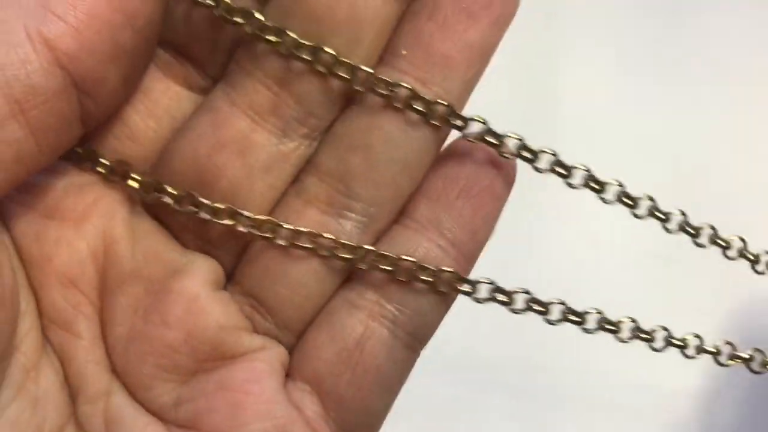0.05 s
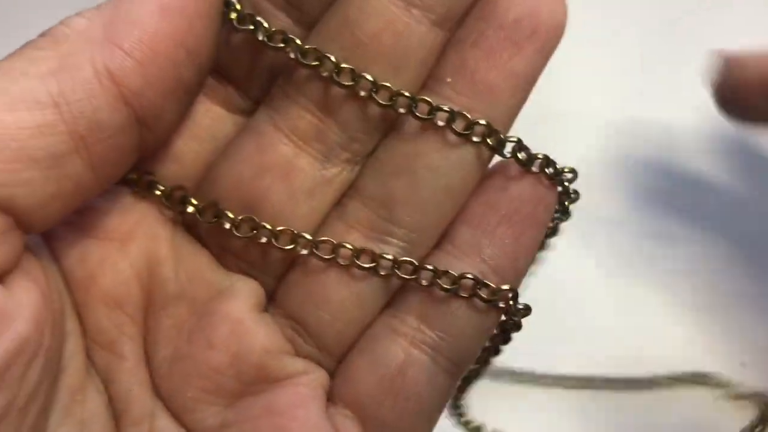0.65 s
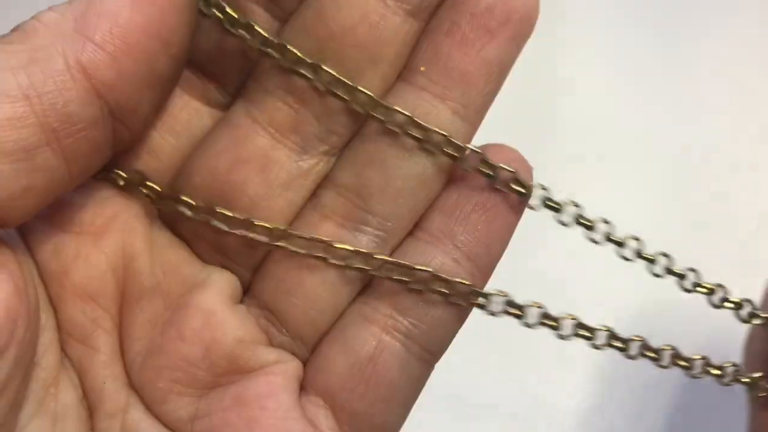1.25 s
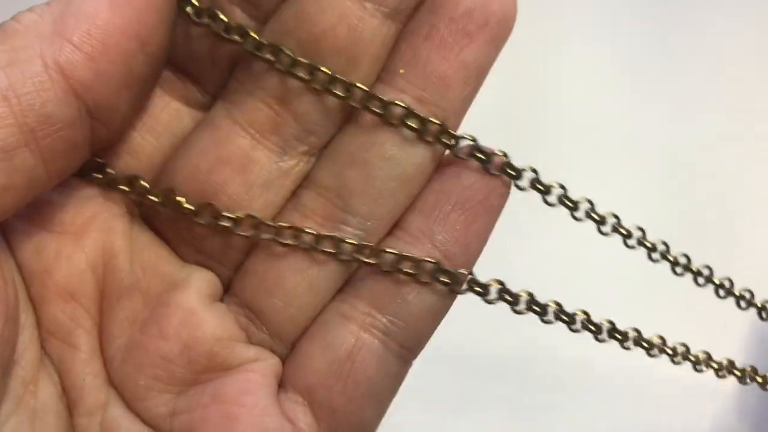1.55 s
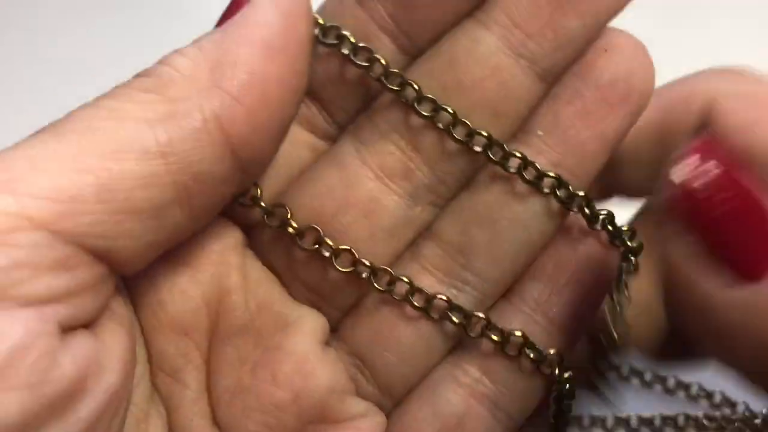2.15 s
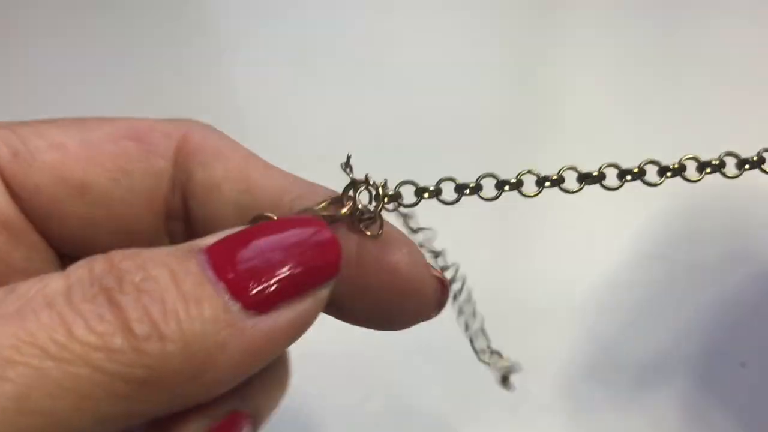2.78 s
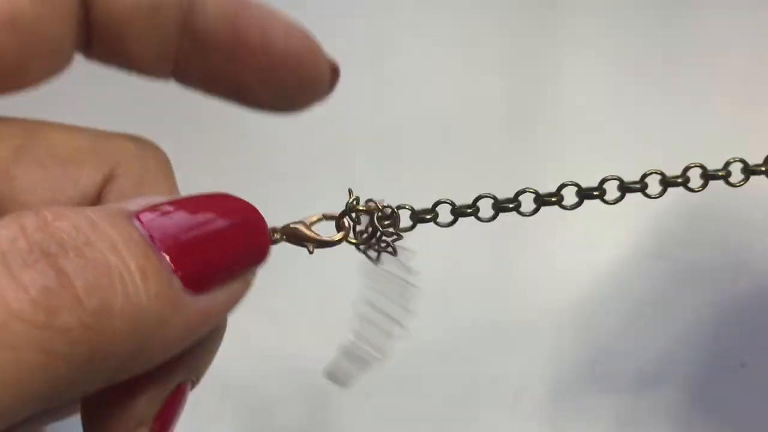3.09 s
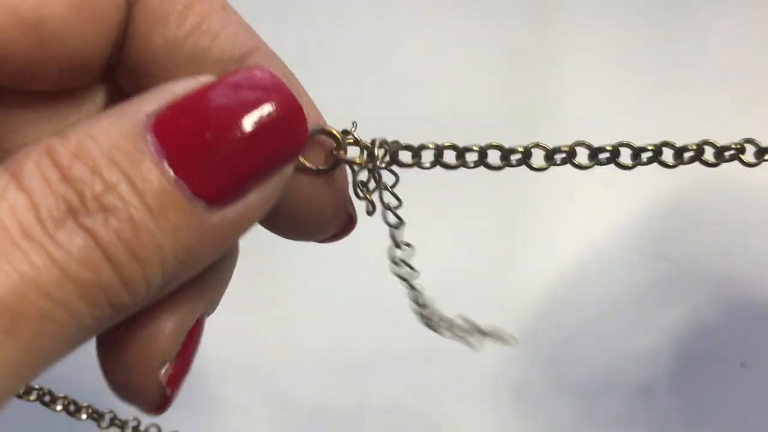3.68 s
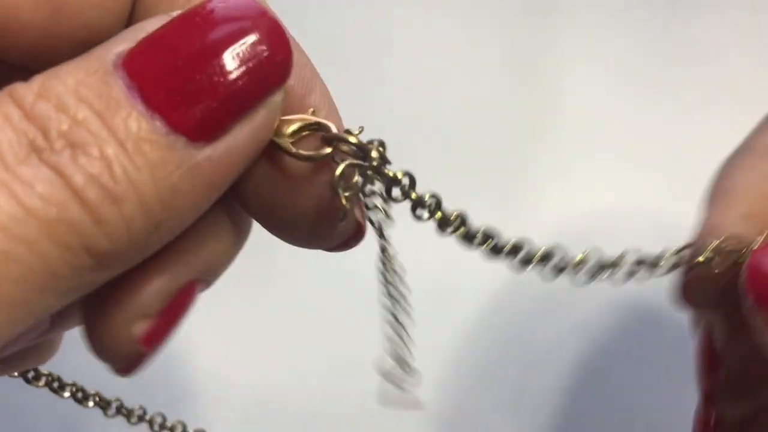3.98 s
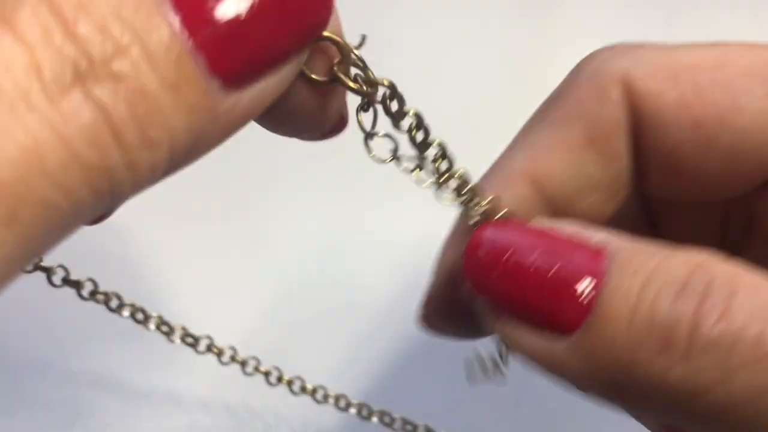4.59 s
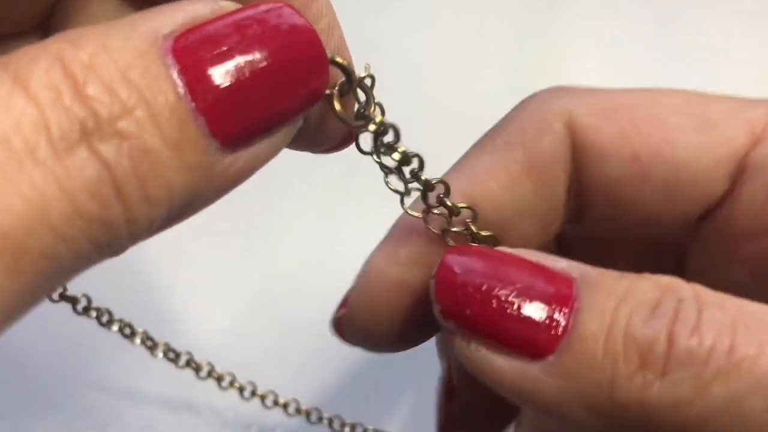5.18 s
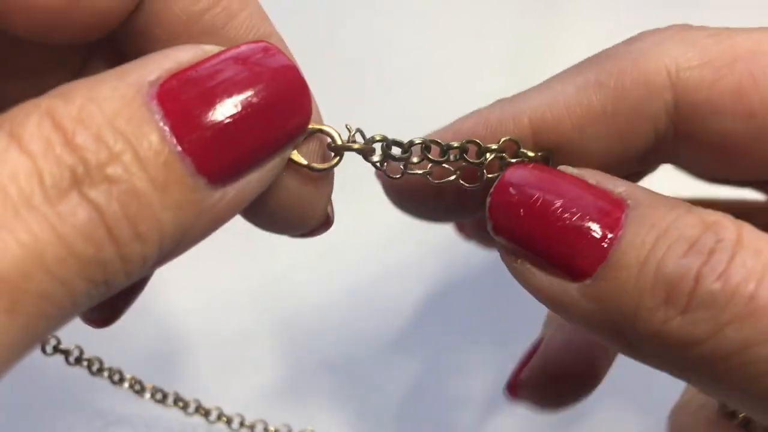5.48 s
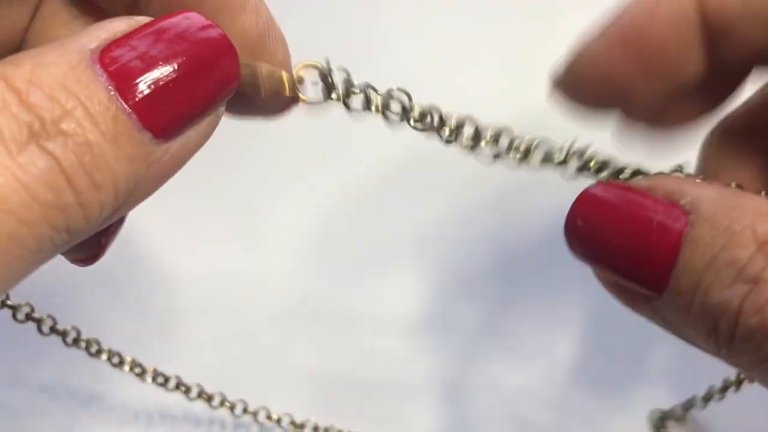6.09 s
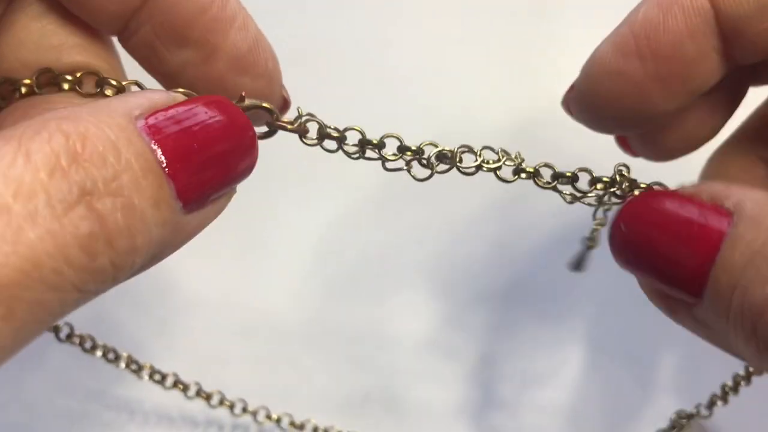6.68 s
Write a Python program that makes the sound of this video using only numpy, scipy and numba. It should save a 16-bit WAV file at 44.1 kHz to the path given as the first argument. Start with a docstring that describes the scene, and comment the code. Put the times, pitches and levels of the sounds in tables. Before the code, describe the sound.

A thin metal chain necklace clinks and rustles in the fingers as it is untangled, the clicks growing fainter and fewer.

```python
"""Small, bright clinks open the scene: a thin metal chain necklace is drawn over the fingers and picked
apart, close to a phone in a small quiet room. Links knock and bounce back with a very short ring.
They rustle in spurts of tiny contacts as the chain slides or drops, and tick at random as the fingers
work at the knot. The duller part of each contact rings at a pitch set by the grip.
The first hard knocks carry a low thud; later the hands make a few soft, low bumps."""
import sys
import numpy as np
from scipy import signal
from scipy.fft import rfft, irfft
from scipy.io import wavfile
from scipy.ndimage import uniform_filter1d
from numba import njit

SR = 44100
rng = np.random.default_rng(int(sys.argv[2]) if len(sys.argv) > 2 else 0)


def to_wav(sig):
    """Store sig (one row per channel, or 1-D mono) as 16-bit WAV at the path in sys.argv[1].

    Samples outside -1..1 are clipped; the rate is SR.
    """
    pcm = np.clip(np.atleast_2d(sig), -1, 1) * 32767
    pcm = np.round(pcm).astype(np.int16)
    wavfile.write(sys.argv[1], SR, pcm.T)  # frames by channels


N = 302085
TIME = np.arange(N) / SR
RING_TIME = np.arange(1024) / SR  # seconds within one short ring

# Tone colours: how strong each pitch is next to the others. Columns: pitch_hz, level_db
AIR_COLOUR = [(20, -16.5), (44, 3.5), (70, -11), (115, -14.5), (155, -8.5), (205, -11.5), (250, -8),
              (295, -20.5), (345, -16), (460, -31.5), (800, -32.5), (2000, -37.5), (5000, -44),
              (16000, -47)]  # the room's background
CONTACT_COLOUR = [(300, -39.5), (1500, -42), (3500, -18), (5400, 2.5), (7500, 8.5), (9500, 8), (11600, 8.5),
                  (15800, 1)]  # the first instant of link touching link
SKIN_COLOUR = [(200, -18.5), (350, -11), (550, -27.5), (800, -18), (1080, -3), (1600, -9), (2100, -3.5),
               (2800, -2), (3500, -3.5), (5500, 0.5), (10000, -6.5), (15000, -26)]  # the chain against skin and nails
# Low thuds: the body of the first hard chain knocks, then soft hand bumps.
# Columns: start_s, level_db, pitch_hz
LOW_THUDS = [(0.013, -44.5, 254.6), (0.031, -45.5, 190.7), (0.949, -24.5, 56.2), (0.991, -20, 51.7),
             (1.0, -39.5, 196.7), (1.019, -34.5, 136), (1.077, -32.5, 56), (3.351, -37, 45.3),
             (4.027, -25.5, 49.5), (4.053, -42, 102.5), (4.11, -41, 50.4), (4.15, -42.5, 75.9),
             (4.336, -44.5, 42.6), (5.523, -40, 100.7), (5.556, -38, 41.95), (6.096, -43.5, 42),
             (6.570, -45.5, 41.2)]
# Fingertips shift their grip. Columns: start_s, length_s, level_db
FINGERTIP_RUBS = [(0.001, 0.071, -43), (4.03, 0.039, -64), (5.51, 0.1, -59)]
# How the grip changes the chain's dull ring. Columns: start_s, length_s, pitch_hz, boost_db
CHAIN_GRIPS = [(0.0, 0.12, 2800, -0.5), (0.49, 0.12, 4240, 7), (1.063, 0.189, 2680, 9.5),
               (1.615, 0.26, 4420, 11), (2.365, 0.074, 2600, 14), (2.72, 0.21, 4360, 8.5),
               (4.401, 0.22, 2700, -7)]
# The brightest ring of the moving links. Columns: time_s, pitch_hz, boost_db
BRIGHT_RINGS = [(0, 11500, -28), (.55, 11900, 0), (1.1, 11230, -23), (1.7, 12600, 0), (2.85, 8900, -10.5),
                (3.85, 11840, 3.5), (4.25, 8200, -16), (5.2, 9200, -3), (6.1, 11400, -5.5)]
# The tones of one link, damped by the fingers. Columns: pitch_hz, fade_s, level_db
# Every fade_s is the time a sound takes to fall by 60 dB.
LINK_TONES = [(5660, 0.0036, -6), (8200, 0.001, -0.5), (10500, 0.0057, -10), (11400, .003, -5),
              (13200, 0.004, 3.5), (14200, 0.0063, -7)]
# The chain slides over the fingers. Columns: start_s, rise_s, length_s, level_db, dull_offset_db
# Here and below, level_db sets the bright part; adding dull_offset_db gives the dull part.
CHAIN_SLIDES = [(0.0, 0.021, .18, -57, 3.5), (0.2, .04, 0.16, -58.5, -3), (0.35, .02, 0.077, -72.5, 8),
                (0.449, 0.079, 0.22, -35.5, -5.5), (0.661, 0.015, .13, -47, -3.5),
                (0.812, 0.047, 0.12, -56, -5), (0.95, 0.087, 0.21, -43.5, 0.5),
                (1.144, 0.025, 0.16, -53, -2), (1.282, .02, 0.26, -66.5, 4.5),
                (1.564, 0.029, 0.15, -55.5, 0), (1.74, 0.025, 0.21, -65, 4),
                (1.953, 0.063, 0.15, -44, -3.5), (2.12, 0.14, 0.23, -44, -3.5), (2.41, .04, .125, -47, 0),
                (2.645, .15, .29, -45, 1), (2.93, 0.11, 0.23, -55.5, 4), (3.299, 0.054, 0.19, -70.5, 3.5),
                (3.72, 0.26, .2, -68, -5), (3.926, .02, .12, -68.5, 2), (4.066, 0.18, 0.24, -60.5, 2.5),
                (4.314, 0.25, 0.35, -60, 4.5), (4.653, 0.026, 0.38, -70.5, 1),
                (5.1, .04, 0.21, -67.5, -1.5), (5.55, 0.02, 0.16, -73, 2), (5.87, 0.086, 0.095, -65, -3),
                (6.049, 0.021, 0.096, -75, -1)]
# A slack stretch drops or is pulled straight. Columns: start_s, level_db, dull_offset_db, fade_s
CHAIN_JINGLES = [(0.036, -31, -2, 0.25), (0.195, -33, -1, 0.22), (0.759, -47, -1, 0.17),
                 (1.622, -37.5, -1.5, 0.22), (1.879, -47.5, -3, 0.75), (1.921, -24, -12, 0.24),
                 (2.356, -33, -3, .22), (2.407, -26, -4, .17), (4.007, -54, 1, 0.14),
                 (4.865, -49.5, -5, 0.2), (5.03, -41.5, -7, 0.15), (5.074, -39, -3, 0.14),
                 (6.056, -51, -6, 0.13)]
# The fingers work at the knot. Columns: start_s, length_s, level_db
PICKING_SPELLS = [(0.198, .12, -45.5), (0.523, .17, -30.5), (0.868, .06, -41), (0.968, .2, -40),
                  (1.191, .3, -55.5), (1.66, .17, -49), (2.254, .22, -40.5), (2.795, .15, -43),
                  (3.07, .1, -61), (3.828, .09, -43.5), (4.439, .22, -61), (4.674, .29, -48),
                  (5.039, .13, -50), (5.598, .38, -59.5)]
# The clearest knocks of link on link. Columns: start_s, level_db, dull_offset_db
LINK_KNOCKS = [(0.0092, -35, 8.5), (0.0138, -17, 1), (0.0324, -14, 2), (0.0376, -21, -15), (0.06, -28.5, 0),
               (0.0861, -34, -1.5), (0.192, -24, -7), (0.1966, -22, -4), (0.3327, -42, -1.5),
               (0.347, -47, 2), (0.4548, -38, -5), (0.523, -30.5, -4), (0.5467, -28, -1.5),
               (0.5874, -27.5, -13), (0.647, -36, -10), (0.723, -34.5, -2.5), (0.7587, -35, -14),
               (0.8766, -37.5, -7.5), (0.8918, -34.5, -13), (0.9097, -38.5, -8.5), (0.9698, -36.5, -11),
               (0.9872, -32, -8.5), (1.02, -32, -5.5), (1.029, -21.5, -9), (1.0522, -28, -16),
               (1.0621, -29, -11), (1.128, -27.5, -3), (1.2125, -39.5, -3.5), (1.2544, -37, -7),
               (1.264, -38, -8), (1.3507, -47.5, 5), (1.431, -46, -1.5), (1.481, -50, 2),
               (1.5839, -58, 7.5), (1.6015, -45, 2), (1.6068, -28, -6.5), (1.6198, -25.5, -3.5),
               (1.6288, -25, -2), (1.68, -43, -2), (1.7033, -39, -1.5), (1.7255, -36, -6.5),
               (1.7784, -44, -0.5), (1.8381, -49, 0.5), (1.872, -48.5, -15.5), (1.877, -32, -4),
               (1.9219, -21, -16), (1.925, -29, -2), (1.934, -27, -1.5), (1.9445, -15.5, -9.5),
               (2.037, -29.5, -7), (2.0663, -26.5, -10), (2.0752, -35.5, -2.5), (2.0837, -30, -7),
               (2.2567, -33, -12), (2.2685, -38, -4), (2.2908, -31, -2), (2.3272, -50, -12),
               (2.3549, -28, 3.5), (2.3591, -28, -3), (2.3754, -25.5, -0.5), (2.405, -21, -4.5),
               (2.4131, -22, -3), (2.422, -21, -9), (2.4442, -27, -13), (2.7371, -33.5, -2.5),
               (2.7887, -28.5, -9.5), (2.8372, -52, -14), (2.9095, -27, -5.5), (2.9339, -29, -5.5),
               (3.0503, -36.5, -7), (3.097, -43, 1), (3.711, -40.5, -6.5), (3.7421, -36, -10),
               (3.7737, -35, -5), (3.8006, -43, -17), (3.8155, -37, -6.5), (3.8633, -35, -8),
               (3.873, -36.5, -8), (3.8862, -46, -9), (3.899, -35, -10), (3.9106, -31.5, -7.5),
               (3.988, -46.5, -10), (4.0062, -36.5, -6), (4.0222, -45, -3), (4.0993, -55.5, -7),
               (4.2633, -38.5, -5.5), (4.329, -50.5, -3), (4.4634, -50.5, -2), (4.5296, -44.5, -7),
               (4.641, -46.5, -3.5), (4.709, -46, -4.5), (4.766, -43.5, -6.5), (4.774, -53, 2),
               (4.8005, -40, -7.5), (4.861, -38, -5), (4.8648, -31, -8), (4.9085, -39, -16),
               (4.9223, -37.5, -4.5), (5.0004, -40, -5.5), (5.0251, -28.5, -9), (5.0337, -31, -10),
               (5.0419, -37, -5), (5.0697, -29.5, -5), (5.0843, -33, -5.5), (5.1792, -44, -5.5),
               (5.2753, -47.5, -6), (5.2852, -50, 1.5), (5.519, -51.5, -3.5), (5.6188, -47, -1.5),
               (5.6475, -41, -4.5), (5.6875, -56, -9), (5.7223, -44.5, -6), (5.7561, -53.5, -1.5),
               (5.9094, -56.5, -7), (5.9437, -51.5, -7.5), (5.9895, -43, -4.5), (6.0513, -49, -13),
               (6.0556, -33, -10.5), (6.103, -48.5, -14), (6.1292, -47.5, -6.5), (6.3301, -55.5, 0.5),
               (6.3584, -62, -10), (6.7504, -59.5, -1)]


def gain(db):
    """Turn decibels into a number to multiply by."""
    return 10 ** (np.asarray(db) / 20)


def unit(x):
    """Scale a sound to an energy of one."""
    return x / np.sqrt(np.sum(x ** 2))


def add(track, start_s, sound):
    """Mix a sound into a track at the given time."""
    i = int(np.clip(start_s * SR, 0, N - 1))
    track[i:i + len(sound)] += sound[:N - i]


def fade(t, fade_s):
    """A level that falls by 60 dB every fade_s seconds."""
    return np.exp(-np.log(1000) * t / fade_s)


def colour_filter(points, size=1024):
    """Make a short click with the tone colour of (pitch_hz, level_db) points, for use as a filter."""
    hz, db = np.transpose(points)
    grid_hz = np.maximum(np.arange(size // 2 + 1) * SR / size, 1)
    grid_db = np.interp(np.log(grid_hz), np.log(hz), db)
    cepstrum = irfft(np.log(gain(grid_db)))
    # folding this onto its first half packs the energy at the start of the click
    cepstrum[1:size // 2] *= 2
    cepstrum[size // 2 + 1:] = 0
    return unit(irfft(np.exp(rfft(cepstrum))))


def through(x, click):
    """Filter a sound: each sample sets off its own copy of the click."""
    return signal.oaconvolve(x, click)[:len(x)]


def room_air(level_db=-54):
    """The room rumbles low, with a thin hiss above."""
    return gain(level_db) * through(rng.standard_normal(N), colour_filter(AIR_COLOUR, size=16384))


def room_echoes(x, table_db=-11, wall_db=-17, low_fade_s=0.36, high_fade_s=0.19):
    """Add quick echoes from hands and table, then a faint tail that loses its treble first."""
    t = np.arange(SR // 2) / SR
    near, low, high = rng.standard_normal((3, len(t)))
    near = unit(near * fade(t, .04) * (t > .0012))
    wall_colour = colour_filter([(200, -6.5), (1100, -6.5), (3000, -11.5), (16000, -37)])
    low = through(low, wall_colour) * fade(t, low_fade_s)
    tail = unit((low + high * fade(t, high_fade_s)) * (t > .007))
    return x + through(x, gain(table_db) * near + gain(wall_db) * tail)


def table_echo(x, delay_s=.00195, echo_db=-8, cutoff_hz=5000):
    """The table top sends back a dull copy a moment later, which ripples the tone colour."""
    echo = signal.lfilter(*signal.butter(1, cutoff_hz, fs=SR), x)
    return x + gain(echo_db) * np.pad(echo, (int(delay_s * SR), 0))[:N]


def low_thuds(rise_s=0.0048, fade_s=0.22, scuff_db=-15):
    """A hard chain knock or a soft hand bump sets off a few low swings and a dull scuff."""
    track, t = np.zeros(N), np.arange(SR // 3) / SR
    colour = colour_filter([(30, -1.5), (170, 0.5), (300, -19), (600, -40), (1500, -30.5),
                            (8000, -80.5)], size=4096)
    swell = (1 - np.exp(-t / rise_s)) ** 2 * fade(t, fade_s)
    swell /= swell.max()
    for start_s, level_db, pitch_hz in LOW_THUDS:
        scuff = gain(scuff_db) * through(rng.standard_normal(len(t)), colour)
        swing = np.sin(2 * np.pi * pitch_hz * t)
        add(track, start_s, gain(level_db) * swell * (scuff - swing))
    return track


def finger_rubs():
    """Fingertips shift their grip with a brief, dull swish."""
    track = np.zeros(N)
    colour = colour_filter([(200, -4), (350, 7), (550, 2), (1300, -2.5), (3000, -10), (12000, -13)])
    for start_s, length_s, level_db in FINGERTIP_RUBS:
        progress = np.linspace(0, 1, int(length_s * SR))
        swish = through(rng.standard_normal(len(progress)), colour)
        add(track, start_s, gain(level_db) * np.sin(np.pi * np.sqrt(progress)) * swish)
    return track


@njit
def resonate(x, pitch_hz, width_hz):
    """Keep only the band of sound around a moving pitch."""
    y, band, low = np.empty(len(x)), 0., 0.
    for i in range(len(x)):
        tuning, damping = np.tan(np.pi * pitch_hz[i] / SR), width_hz / pitch_hz[i]
        swing = (band + tuning * (x[i] + 1e-18 - low)) / (1 + tuning * (tuning + damping))
        band = 2 * swing - band
        low += 2 * tuning * swing
        y[i] = damping * swing
    return y


def grip_ring(dull, free_hz=4360., free_db=3.5, pinch_s=0.018, width_hz=520., upper_hz=5500.):
    """The held chain rings at two pitches; the lower follows the grip and is lowest when pinched."""
    pitch_hz, boost_db = np.full(N, free_hz), np.full(N, free_db)
    for start_s, length_s, grip_hz, grip_db in CHAIN_GRIPS:
        inside_s = np.minimum(TIME - start_s, start_s + length_s - TIME)
        grip = np.clip(1 + inside_s / pinch_s, 0, 1)
        pitch_hz += grip * (grip_hz - free_hz)
        boost_db += grip * (grip_db - free_db)
    lower = resonate(dull, pitch_hz, width_hz)
    upper = gain(-5) * resonate(dull, np.full(N, upper_hz), width_hz)
    boost = gain(boost_db)
    return (dull + boost * (lower + upper)) / (1 + .26 * boost)


def bright_ring(bright, width_hz=2300.):
    """Different stretches of the chain favour different parts of the treble."""
    time_s, pitch_hz, boost_db = np.transpose(BRIGHT_RINGS)
    ring = resonate(bright, np.interp(TIME, time_s, pitch_hz), width_hz)
    boost = gain(np.interp(TIME, time_s, boost_db))
    return (bright + boost * ring) / (1 + 0.25 * boost)


def link_tick(crack, detune=0.012, scatter_db=2, ring_db=-8.5):
    """A hard crack and a short ring; each link has its own size and is struck at its own spot."""
    pitch_hz, fade_s, level_db = np.transpose(LINK_TONES)[:, :, None]
    size, spot = rng.standard_normal((2, len(pitch_hz), 1))
    signs = rng.choice([-1, 1], (len(pitch_hz), 1))
    strength = signs * gain(level_db + scatter_db * spot) / np.sqrt(fade_s)
    tones = np.sin(2 * np.pi * pitch_hz * (1 + detune * size) * RING_TIME)
    ring = np.sum(strength * tones * fade(RING_TIME, fade_s), axis=0)
    return unit(crack + gain(ring_db) * unit(ring))


def chain_motion(onset_db=-18, stop_fade_s=0.095, jingle_rise_s=.004):
    """Bright and dull levels over time: slides speed up, hold and stop; jingles jump up and fade."""
    bright_power, dull_power = np.zeros((2, N))
    t = TIME[:SR]

    def add_move(start_s, shape, level_db, dull_offset_db):
        add(bright_power, start_s, (gain(level_db) * shape) ** 2)
        add(dull_power, start_s, (gain(level_db + dull_offset_db) * shape) ** 2)

    for start_s, rise_s, length_s, level_db, dull_offset_db in CHAIN_SLIDES:
        speed_up = gain(onset_db * np.maximum(1 - t / rise_s, 0))
        stop = fade(np.maximum(t - length_s, 0), stop_fade_s)
        add_move(start_s, speed_up * stop, level_db, dull_offset_db)
    for start_s, level_db, dull_offset_db, fade_s in CHAIN_JINGLES:
        add_move(start_s, np.minimum(t / jingle_rise_s, 1) * fade(t, fade_s), level_db, dull_offset_db)
    return np.sqrt([bright_power, dull_power])


def catch_and_slip(slips_per_s=110, fade_s=0.023, depth=0.43):
    """Links catch and slip one after another, so the rustle's level comes in uneven spurts."""
    slips = (rng.random(N) < slips_per_s / SR) * (.5 + rng.random(N))
    spurts = np.maximum(through(slips, fade(TIME[:SR // 8], fade_s)), 0)
    average = uniform_filter1d(spurts, size=2200)
    return 1 - depth + depth * spurts / (average + .02)


def tiny_hits(per_s, spread_db):
    """Random tiny impacts, many weak and few strong, evened out to a power near one."""
    happens = rng.random(N) < per_s / SR
    sizes = gain(spread_db * np.minimum(rng.exponential(size=N), 4))
    hits = happens * sizes * rng.choice([-1, 1], N)
    power = np.maximum(uniform_filter1d(hits ** 2, size=1300), 0)
    return hits / np.sqrt(power + 1e-3)


def chain_rustle(link_count=16, hits_per_s=4200, reference_db=-45, skin_hits_per_s=4000):
    """Bright ticks crowd into a rustle as the chain slides faster; it also rubs dully over the skin."""
    bright_level, dull_level = chain_motion()
    per_s = hits_per_s * (bright_level / gain(reference_db)) ** .45
    spurts = catch_and_slip()
    hits, crack = tiny_hits(per_s, spread_db=4), colour_filter(CONTACT_COLOUR)
    struck_link = rng.integers(0, link_count, N)
    ticks = sum(through(hits * (struck_link == link), link_tick(crack)) for link in range(link_count))
    skin_hits = tiny_hits(per_s + skin_hits_per_s, spread_db=3.9)
    rubbing = through(skin_hits + gain(-4.5) * hits, colour_filter(SKIN_COLOUR))
    return np.array([bright_level * spurts * ticks, dull_level * np.sqrt(spurts / 2) * rubbing])


def loose_link_rows(ticks_per_s=42, spread_db=4, dull_offset_db=-8):
    """Loose links tick at uneven times while the fingers work; gives rows like those of LINK_KNOCKS."""
    rows = []
    for start_s, length_s, level_db in PICKING_SPELLS:
        chance = rng.random((64, 3))
        times = start_s + np.cumsum(.3 + 1.4 * chance[:, 0]) / ticks_per_s
        scatter_db = spread_db * np.sqrt(12) * (chance[:, 1:] - .5)
        for time_s, (level_change, dull_change) in zip(times, scatter_db):
            if time_s < start_s + length_s:
                rows.append((time_s, level_db + level_change, dull_offset_db + dull_change))
    return rows


def link_chatter(jolt_db, jolt_fade_s=0.006, rise_s=.0007):
    """Two links meet at a few points in about a millisecond; the jolt runs on through their neighbours."""
    meeting, jolt = rng.standard_normal((2, len(RING_TIME)))
    meeting = unit(meeting * np.minimum(RING_TIME / rise_s, 1) * fade(RING_TIME, .003))
    jolt = unit(jolt * np.abs(jolt) * fade(RING_TIME, jolt_fade_s))
    return meeting + gain(jolt_db) * jolt


def link_knocks(rows, lead_in_s=0.0025, lead_in_db=-22.5, bounce_s=0.0049, bounce_db=-9):
    """A link knocks and bounces twice, weaker each time; gives the bright and dull parts."""
    bright, dull = np.zeros((2, N))
    crack, skin = colour_filter(CONTACT_COLOUR), colour_filter(SKIN_COLOUR)
    scale = np.sqrt(.003 * SR)  # makes level_db the level of a knock's energy spread over 3 ms
    lead_samples = int(lead_in_s * SR)
    lead_s = lead_samples / SR
    for start_s, level_db, dull_offset_db in rows:
        push = np.zeros(2 * len(RING_TIME))
        # a faint, brief hiss swells into each knock and softens its start
        hiss = rng.standard_normal(len(RING_TIME))[:lead_samples] * np.linspace(0, 1, lead_samples)
        push[:lead_samples] = gain(lead_in_db) * unit(hiss)
        jolt_db = -4 + 0.11 * max(level_db + 46, 0)  # a harder knock shakes the neighbours more
        delay_s = lead_s
        for bounce in range(3):
            add(push, delay_s, gain(bounce * bounce_db) * link_chatter(jolt_db))
            delay_s += bounce_s * (.5 + rng.random())
        tick, clack = unit(through(push, link_tick(crack))), unit(through(push, skin))
        add(bright, start_s - lead_s, scale * gain(level_db) * tick)
        add(dull, start_s - lead_s, scale * gain(level_db + dull_offset_db) * clack)
    return np.array([bright, dull])


def scene():
    """Mix the chain and its echoes with thuds, finger rubs and the room's background, in one channel."""
    bright, dull = link_knocks(LINK_KNOCKS) + chain_rustle() + link_knocks(loose_link_rows())
    chain = bright_ring(bright) + grip_ring(dull)
    chain = room_echoes(table_echo(chain))
    return (chain + low_thuds() + finger_rubs() + room_air())[None]


def record(dry, dip_hz=10450, dip_sharpness=14, dip_depth=0.46, top_hz=15800):
    """The phone's microphone has a narrow dip in the treble, and the very top is cut."""
    dipped = signal.lfilter(*signal.iirnotch(dip_hz, dip_sharpness, fs=SR), dry)
    heard = dry + dip_depth * (dipped - dry)
    return signal.sosfilt(signal.ellip(8, .2, 70, top_hz, fs=SR, output="sos"), heard)


dry = scene()
out = record(dry)
to_wav(out)
```